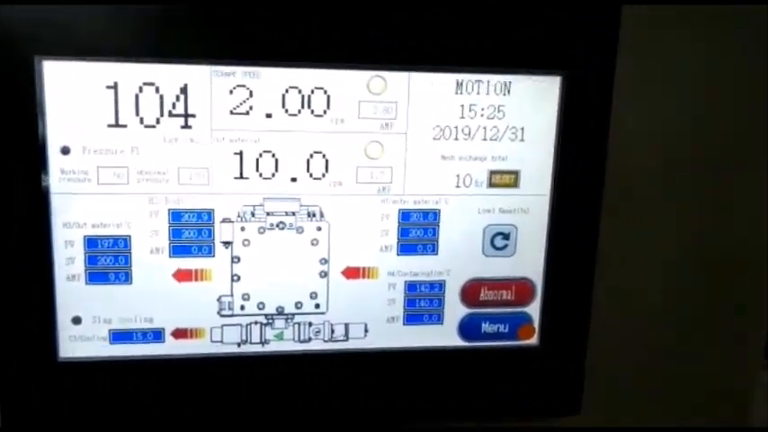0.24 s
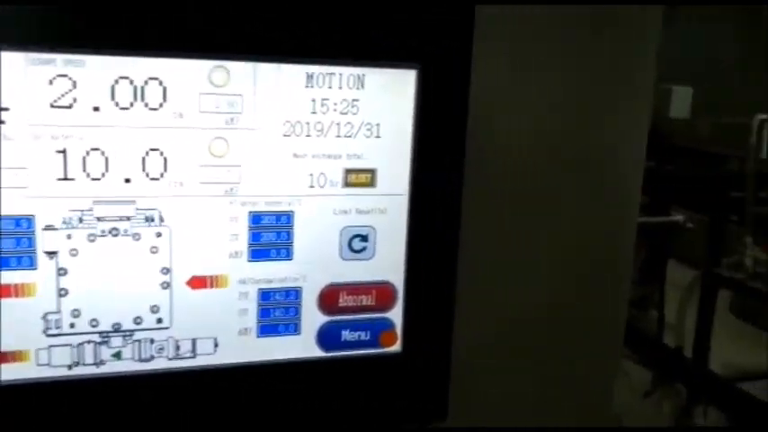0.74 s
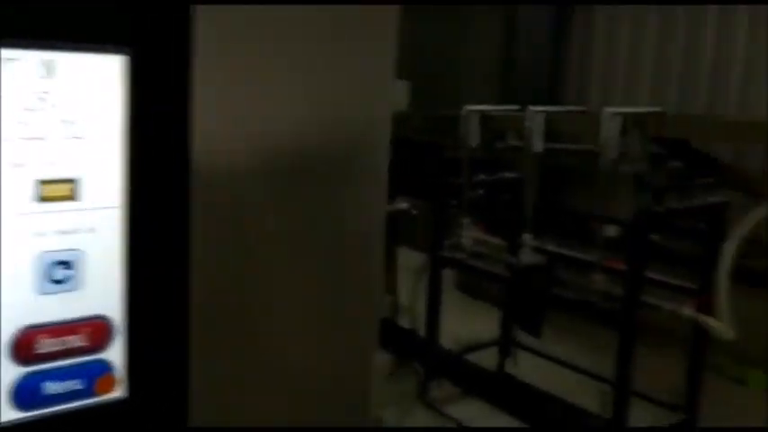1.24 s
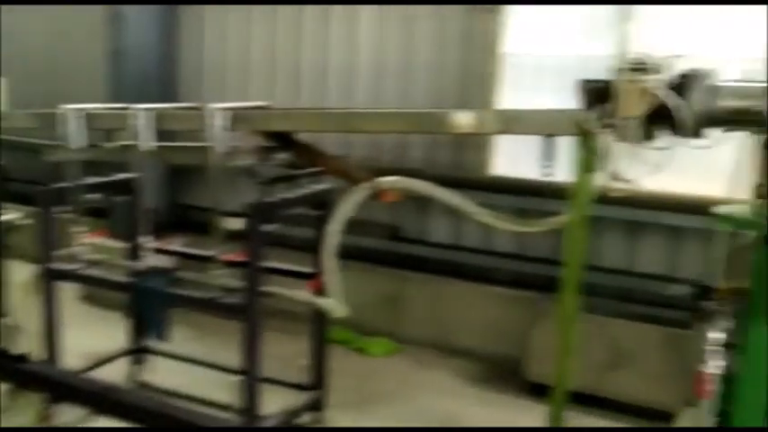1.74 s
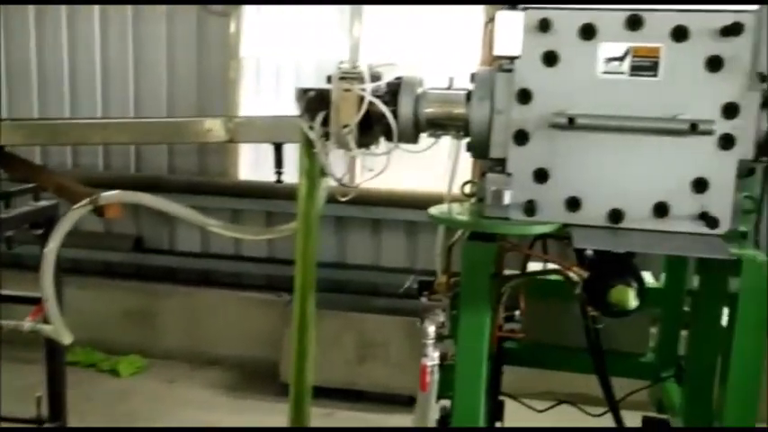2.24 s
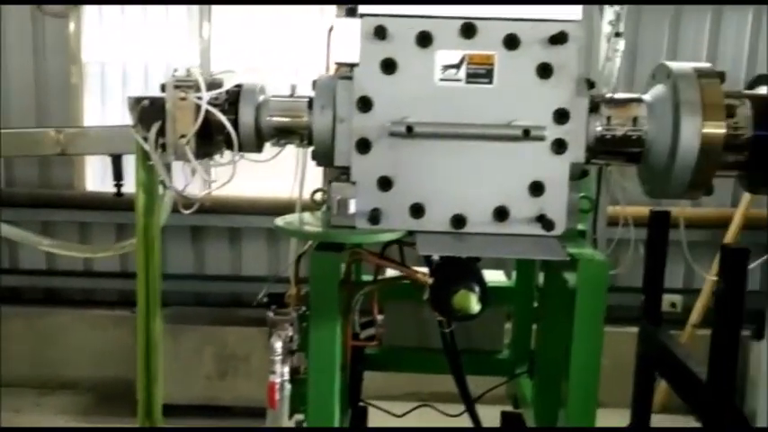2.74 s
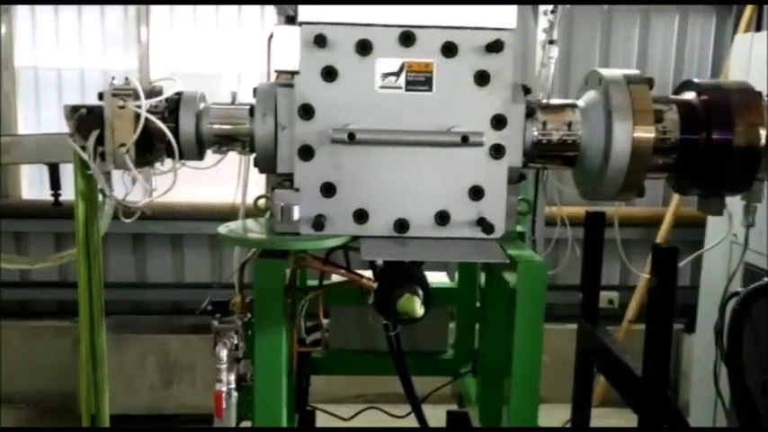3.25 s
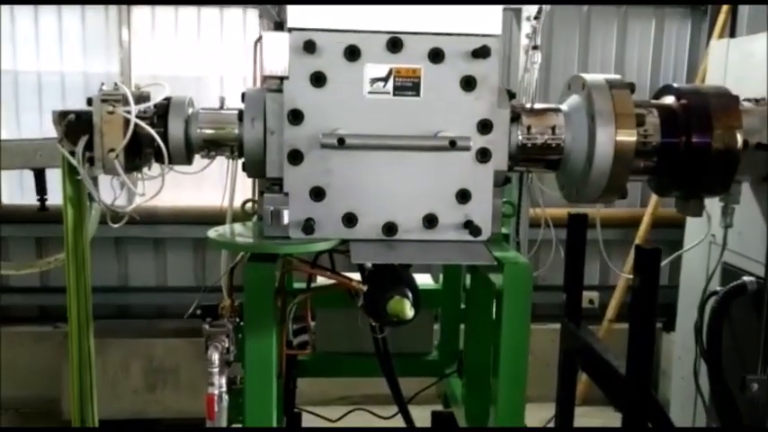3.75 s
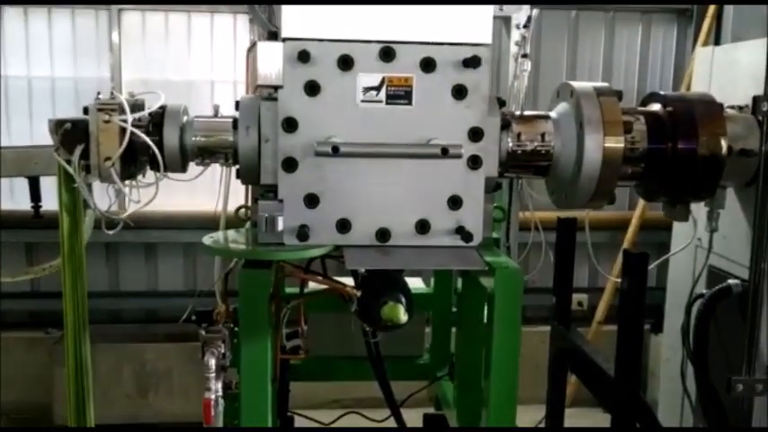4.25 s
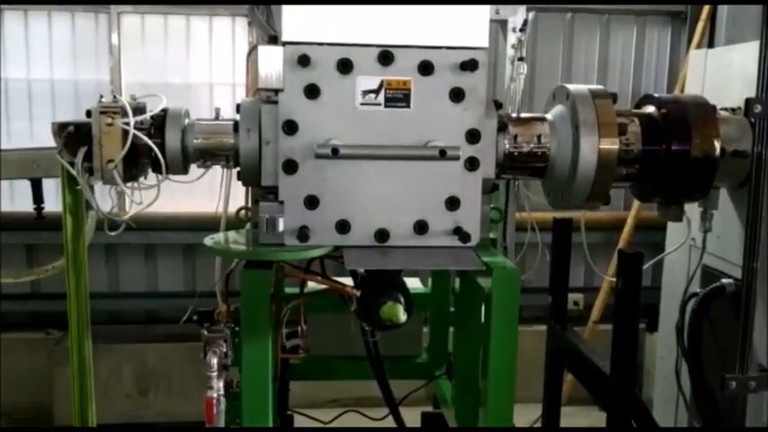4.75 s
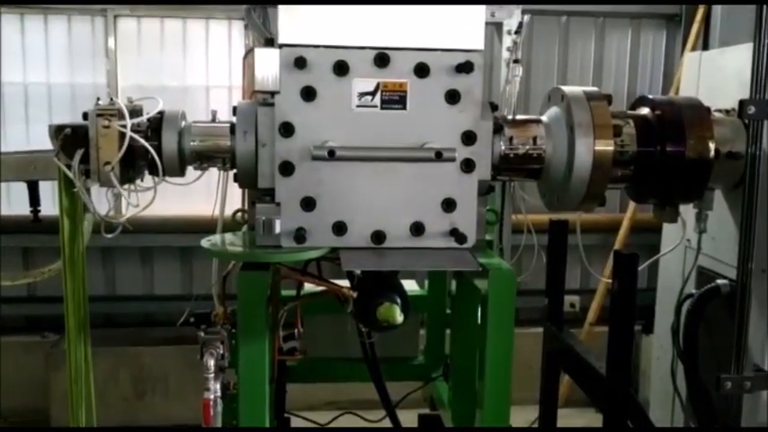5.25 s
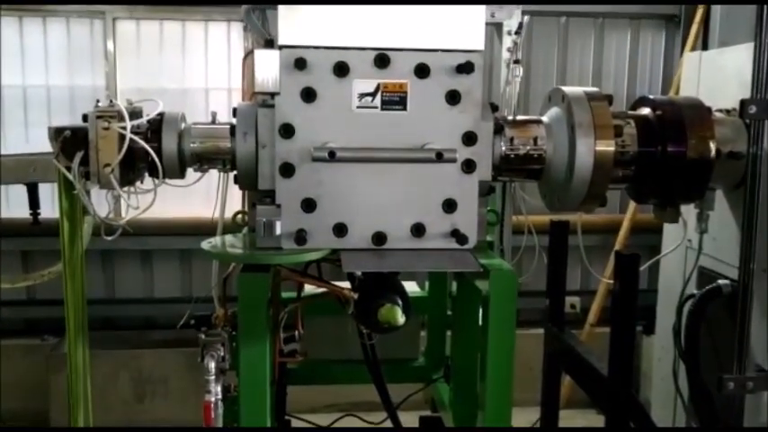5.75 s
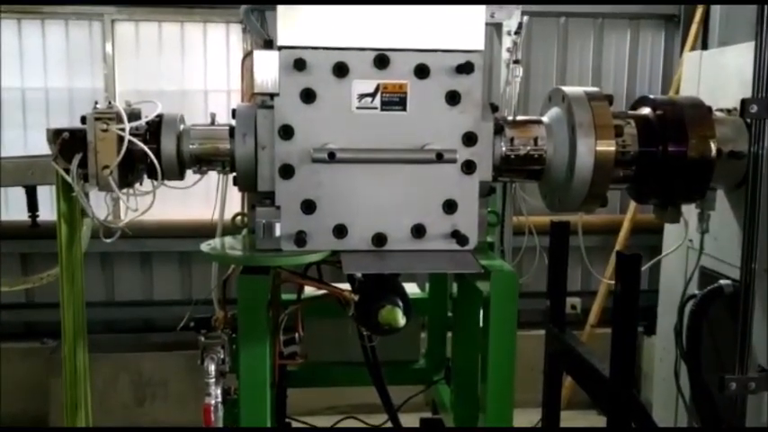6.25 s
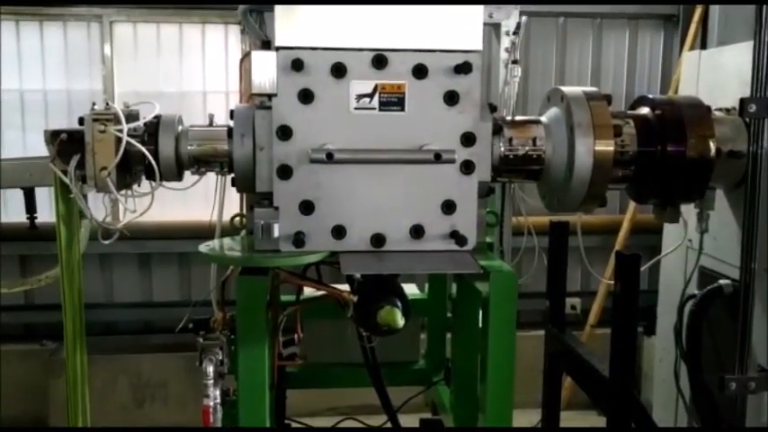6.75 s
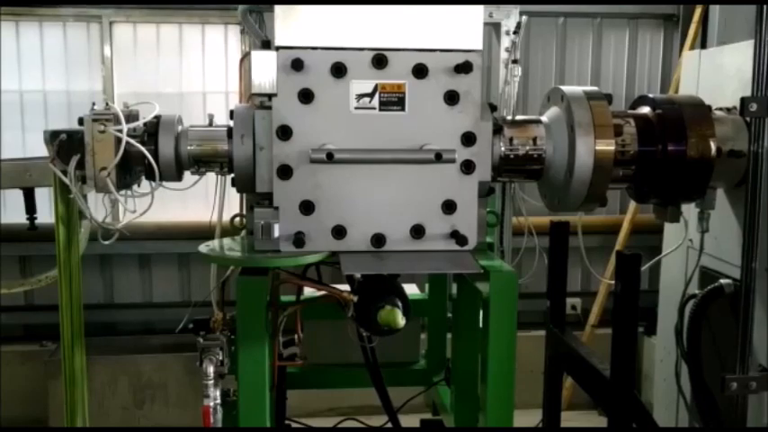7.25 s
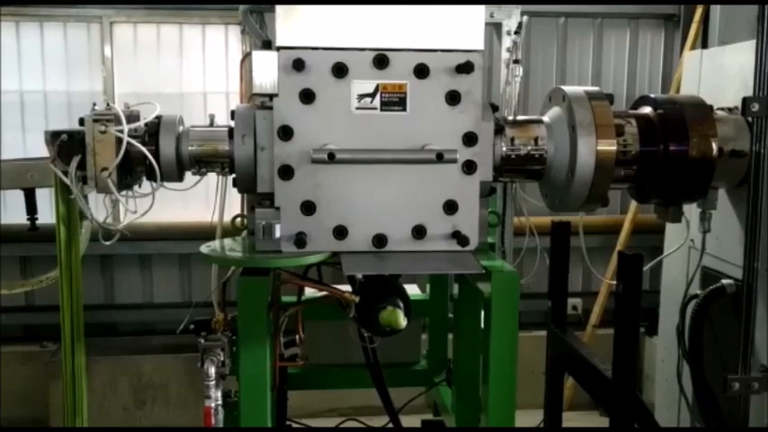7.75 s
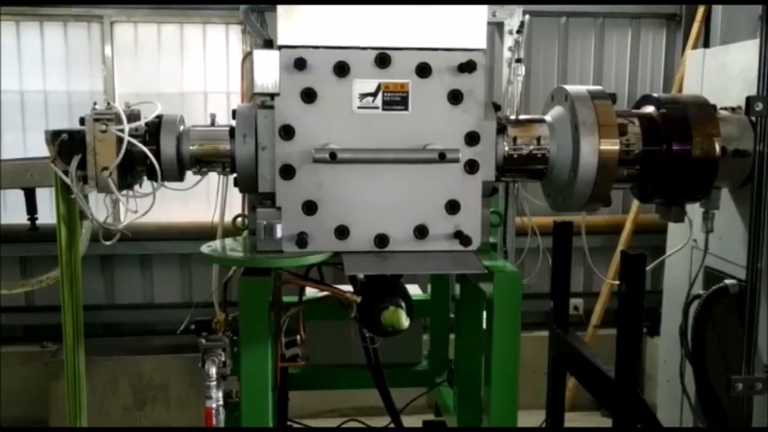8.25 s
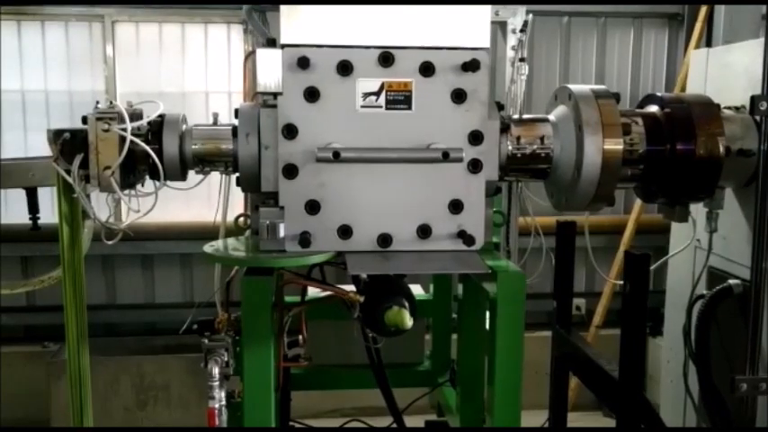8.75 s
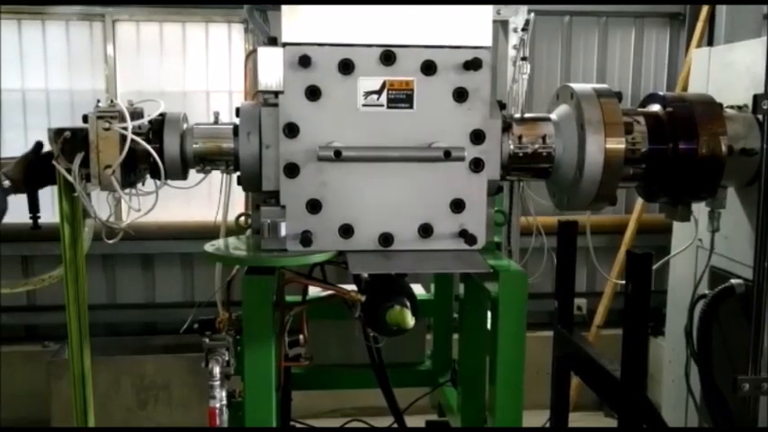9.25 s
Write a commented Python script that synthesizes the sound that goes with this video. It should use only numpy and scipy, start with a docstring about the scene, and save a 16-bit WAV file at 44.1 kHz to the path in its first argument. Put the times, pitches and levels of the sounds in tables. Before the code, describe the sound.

In a reverberant factory hall, an extruder's motor inverter gives a piercing, dense cluster of high whines, creeping slowly upward and surging unevenly between left and right. Gear tones, low hum, rumble and a broad airy roar run beneath. The hand-held stereo microphone swings from control panel to machine; the noise grows slightly fuller, the main whine later eases, and everything stops dead.

```python
"""A motor inverter whines on an extruder line in a factory hall: a comb of lines round a slowly rising
pitch, mixed from switching rate and motor turning, surging as lines cross standing waves. Gears, shafts
and a distant inverter hum as tones that fade in and out; filtered noise makes thrum, rumble, roar and
hiss. A hand-held stereo microphone swings from control panel to extruder. The sound stops dead."""
import sys
import numpy as np
from scipy import signal
from scipy.io import wavfile
from scipy.ndimage import uniform_filter1d

SR = 44100
rng = np.random.default_rng(int(sys.argv[2]) if len(sys.argv) > 2 else 0)


def transcribe(signal):
    """Save signal, clipped to [-1, 1], as a 16-bit WAV file at the path in sys.argv[1]."""
    frames = np.atleast_2d(signal).T
    limited = np.clip(frames, -1, 1)
    pcm = np.round(limited * 32767).astype(np.int16)
    wavfile.write(sys.argv[1], SR, pcm)


def gain_from_decibels(decibels):
    """Convert decibel values to linear amplitude factors."""
    exponent = np.asarray(decibels, float) / 20
    return 10 ** exponent


N = 419391

# Gliding inverter. Each row: time in s, switching rate in Hz, motor turning in Hz, outer line spacing in Hz.
INVERTER_GLIDE = [(0.0, 3086.7, 18.9, 392.9), (1.0, 3111.3, 18.5, 392.8), (2.0, 3128.6, 18.2, 392.5),
                  (3.5, 3152.2, 17.9, 392.1), (4.0, 3159.8, 17.6, 385.5), (4.5, 3167.0, 17.1, 369.5),
                  (5.5, 3182.4, 16.2, 323), (6.0, 3192.4, 16.0, 298.9), (7.0, 3220.1, 16.1, 240),
                  (8.0, 3252.6, 16.5, 214.5), (9.0, 3289.2, 16.7, 194.2), (9.5, 3308.9, 16.7, 184.0)]
# Strong comb lines. Each row: multiples of switching rate, outer spacing, motor turning.
STRONG_LINE_MIX = [(1, 0, -3), (1, 0, 3), (1, -1, -3), (1, -1, 3)]
# Strong comb lines. Each entry: level in dB before COMB_GAIN.
STRONG_LINE_DB = [-40, -42, -39.5, -40]
# Weak comb lines. Each row: multiples of switching rate, outer spacing, motor turning.
WEAK_LINE_MIX = [(1, 0, -9), (1, 0, -7), (1, 0, -5), (1, 0, -1), (1, 0, 1), (1, 0, 5), (1, 0, 9),
                 (1, 0, 15), (1, 0, -15), (1, -1, -15), (1, -1, -9), (1, 1, -3), (1, 1, -1), (1, 1, 3),
                 (1, 1, 9), (2, 0, -2), (2, 0, 2), (2, -1, 0), (2, -1, 2), (2, 1, -2)]
# Weak comb lines. Each entry: level in dB before COMB_GAIN.
WEAK_LINE_DB = [-40, -47, -42, -43, -41, -42, -43, -55, -50, -51, -46, -42, -53, -45, -57, -63, -59, -65,
                -63, -60]
# Gain of strong and weak lines. Each row: time in s, gain in dB.
COMB_GAIN = [(0, 4.5), (1.5, 4.5), (3, 2.5), (4.5, 5.5), (6, 3), (7.5, -2), (9.5, -4)]
# Standing-wave surges of the lower, upper and octave line, one list per line.
# Each row: centre in s, left peak in dB, right peak in dB, left lead in rad; overlapping surges add.
LINE_SURGES = [
    [(.1, -26, -27, 2.2), (.3, -30, -30, -3), (.52, -23, -27, 2), (1.0, -30, -20.5, -1.5),
     (1.25, -29, -24.5, 1.7), (1.56, -35, -21, 3), (2.04, -23, -21.5, 1.5), (2.55, -21, -31, -2.5),
     (2.78, -32.5, -27.5, 0), (3.05, -30, -28.5, -2.5), (3.65, -46, -28, 2), (4.0, -33, -32, 5),
     (4.2, -38, -34, 1.5), (4.46, -37, -29, 0.5), (4.9, -37, -42, 7), (5.7, -24.5, -34, -1),
     (6.36, -31, -26, -1.5), (6.62, -34, -28.5, 2.8), (7.26, -28, -27, 2), (8.76, -39, -39, 3),
     (9.1, -42, -35, -2.5)],
    [(.12, -36, -32, 2.3), (.36, -37, -25.5, 3.1), (.66, -32, -28, 2), (.86, -24.5, -30, 0),
     (1.65, -25.5, -32, -3), (2.3, -38, -26, 4), (2.64, -35, -28, 4), (3.0, -38, -28, 3.5),
     (4.02, -25, -36, -2), (4.64, -28, -24, -.5), (4.95, -39, -28, -1), (5.48, -48, -28, -5),
     (6.55, -36, -34.5, 1.3), (6.84, -32.5, -33, -1.8), (7.2, -35, -30, 1), (7.58, -37, -43, 2),
     (7.82, -29, -48, 1), (8.52, -34, -42, -0.5), (8.95, -33, -33, 0.9)],
    [(.1, -62, -43, 1), (.55, -54, -40, -1), (3.3, -57, -50, -.6), (3.65, -62, -47, -.9),
     (4.6, -54, -48, -3), (4.85, -54, -44, 0), (5.5, -57, -43, -2), (7.6, -58, -53, -4),
     (8.4, -58, -51, 1.3)],
]
# Steady gear tones. Each entry: frequency in Hz.
GEAR_TONE_HZ = [153.4, 920.9]
# Steady gear tones. Each row: level at panel in dB and at extruder in dB (both before the waver),
# left over right in dB, left lead in rad, waver depth from 0 to 1.
GEAR_TONE_ROWS = [(-36.5, -41.5, -1.6, -0.16, .4), (-37, -30.5, -6, 1.07, 0.02)]
# Gear tones with shifting standing waves. Each entry: frequency in Hz.
SHIFTING_GEAR_HZ = [230.1, 654, 429.3, 2072.8, 2094]
# The same tones at the ears, one list per tone.
# Each row: time in s, left level in dB, right level in dB, left lead in rad.
SHIFTING_GEAR_ROWS = [
    [(0, -37.5, -34, 0), (1, -42, -39, .1), (1.5, -37, -34, 0), (2.2, -39, -34, -.2), (3.5, -43, -41, -.2),
     (5, -36.5, -35.5, -.2), (5.5, -38, -35.5, -.1), (6.1, -34, -31.5, -.2), (6.9, -41, -38.5, -.1),
     (8.1, -35.5, -33, -0.16), (9.5, -43, -41, -.1)],
    [(0, -36, -34.5, -.7), (1.05, -37, -34, -.8), (1.35, -61, -62, -0.88), (2.3, -46, -41, -.7),
     (3, -53, -47, -.9), (3.7, -46, -42, -0.94), (9.5, -44.5, -40.5, -1.1)],
    [(0, -39, -48, .2), (2.1, -36.5, -36.5, .3), (3.1, -43, -36.5, .3), (4.2, -49, -43, .3),
     (5, -53.5, -59, .3), (9.5, -57, -50.5, .2)],
    [(0, -24.5, -28, -1.5), (.7, -31.5, -38, -0.3), (1.1, -30, -27.5, -0.5), (1.45, -29, -27.5, -1.2),
     (1.6, -38, -28.5, -4), (1.8, -31, -24, -1.6), (2.15, -35, -36, 2.5), (2.5, -28, -35, -1.8),
     (3.2, -44, -30.5, -2.5), (3.85, -29, -27, -3.5), (4.5, -28.5, -38, -3.5), (5.0, -40, -43, -8.5),
     (5.95, -34, -28.5, -5), (6.4, -39, -36.5, -6), (7.1, -32, -33.5, -5), (8.35, -29, -31, -5),
     (8.8, -42, -29.5, -9), (9.5, -36, -26, -5.5)],
    [(0, -40, -47, 3.8), (1, -49, -47, 4), (1.5, -40, -33, 3.9), (3, -53, -46, 5.5), (5.75, -51, -47, 5.4),
     (6.25, -28, -36, 9.4), (6.6, -30, -39, 8.2), (7.1, -30.5, -32.5, 6.6), (8, -34, -28, 7),
     (8.6, -38, -27, 7.2), (9.5, -39, -24.5, 8.6)],
]
# Shaft, pump and housing hum. Each row: frequency in Hz, level in dB, fade rate in 1/s.
HUM_TONES = [(57.9, -48, 4), (76.7, -47, 4), (134, -47, 6), (176.3, -44, 6), (270.5, -41, 4), (293, -47, 4),
             (345.9, -42, 4), (400, -47, 8), (455, -51, 4), (605.6, -50, 3), (634, -52, 3), (690.4, -46, 3),
             (755, -53, 6), (981.1, -48, 3), (1036.3, -49, 3), (1094.2, -54, 3), (1308.1, -53, 4),
             (1324, -53, 4), (1380.8, -52, 4), (1745, -54, 6), (2298.7, -47, 4), (2321.5, -46, 4),
             (2476.3, -52, 4)]
# Distant steady inverter. Each row: frequency in Hz, level in dB, fade rate in 1/s.
FAR_INVERTER_TONES = [(3929.8, -57, 3), (3970.2, -57, 3), (3999.8, -57, 3), (4029.4, -57, 3),
                      (4068.4, -57, 3), (4500.4, -56, 4), (5970.1, -64, 4), (7979.4, -69, 3),
                      (8018.4, -70, 3), (9350.8, -70, 6), (11929.4, -67, 4), (11968.4, -63, 4),
                      (12027.6, -68, 4), (12068, -69, 4)]
# Deepest noise, spectrum shape. Each row: frequency in Hz, relative density in dB per Hz.
THRUM_SHAPE = [(12, -55), (20, -18), (41, -4.5), (59, -1), (95, 2), (120, -30), (210, -120)]
# Thrum swells. Each row: centre in s, half width in s, rise in dB.
THRUM_SWELL_ROWS = [(1.2, .25, 2), (1.6, 0.067, 3), (3.1, .15, 9), (5.42, .08, 3), (6.1, .3, 9.5),
                    (7.7, 0.2, 5.5), (8.4, .12, 4)]
# Low noise, spectrum shape. Each row: frequency in Hz, relative density in dB per Hz.
RUMBLE_SHAPE = [(47, -35), (80, -11.5), (146, -2), (245, -1.5), (402, -3), (502, -8.5), (652, -6),
                (835, -6), (914, -6), (989, -7), (1110, -10.5), (1800, -9.5), (2340, -47), (3960, -120)]
# Middle noise, spectrum shape. Each row: frequency in Hz, relative density in dB per Hz.
ROAR_SHAPE = [(760, -39), (1300, -8), (1700, -8.5), (1890, -7), (2070, -0.5), (2200, -2), (2360, -0.5),
              (2740, -4.5), (3250, -4), (3720, -12.5), (4300, -22), (5590, -31), (9460, -120)]
# High noise, spectrum shape. Each row: frequency in Hz, relative density in dB per Hz.
HISS_SHAPE = [(2350, -25), (4000, 0.5), (5350, -7), (6440, -5.5), (7000, -16), (7620, -21.5), (8200, -19.5),
              (9170, -10), (10100, -13), (12000, -11.5), (13100, -14.5), (14200, -26)]
# Microphone swing. Each row: time in s, share of the way from panel to extruder.
SWING = [(0, 0.24), (1.0, 0.23), (1.5, 0.29), (2.7, 0.82), (9.5, 1)]
# Diffuse field. Each row: frequency in Hz, left-right likeness from 0 to 1.
EAR_LIKENESS = [(60, 0.91), (160, 0.99), (430, 0.83), (710, 0.75), (1160, 0.4), (1900, 0.37), (3100, 0.094),
                (5000, 0.065), (14000, .05)]
# Diffuse field. Each row: frequency in Hz, left lead of the shared part in rad.
EAR_LEAD = [(0, -1), (690, 0.52), (1640, 3), (2330, -1), (4220, -5.5), (6370, -8), (13000, -49),
            (13900, -38)]
# Diffuse field. Each row: frequency in Hz, left over right in dB.
EAR_TILT = [(60, -0.5), (120, -1.5), (230, -1.5), (460, -1), (910, -2.5), (1790, -3), (3520, 0.5),
            (6950, -4), (13700, -8)]


def inverter():
    """Switching mixes with the motor's turning into a comb; three lines also surge."""
    switching_hz, turning_hz, spacing_hz = curves(INVERTER_GLIDE)
    drive_hz = np.array([switching_hz, spacing_hz, turning_hz])
    strong = sum(fading_tone(np.dot(mix, drive_hz), db, per_s=8)
                 for mix, db in zip(STRONG_LINE_MIX, STRONG_LINE_DB))
    weak = sum(fading_tone(np.dot(mix, drive_hz), db, per_s=9)
               for mix, db in zip(WEAK_LINE_MIX, WEAK_LINE_DB))
    octave = fading_tone(2 * switching_hz, -55, per_s=3)
    surging_hz = [*np.dot(STRONG_LINE_MIX[:2], drive_hz), 2 * switching_hz]
    surges = sum(surging_line(hz, rows) for hz, rows in zip(surging_hz, LINE_SURGES))
    return (strong + weak) * gain_from_decibels(curves(COMB_GAIN)[0]) + octave + surges


def surging_line(hz, rows):
    """A gliding line surges as it crosses standing waves; each surge is a Gaussian in time."""
    half_width_s = 0.13
    slow_s = np.arange(0, N + 256, 256) / SR
    s, left_db, right_db, lead_rad = np.transpose(rows)[:, :, None]
    shape = np.exp(-0.5 * ((slow_s - s) / half_width_s) ** 2)
    left = (shape * gain_from_decibels(left_db) * np.exp(0.5j * lead_rad)).sum(0)
    right = (shape * gain_from_decibels(right_db) * np.exp(-0.5j * lead_rad)).sum(0)
    return placed_tone(hz, smooth([left, right]), flutter=0.4, per_s=14)


def gears():
    """Gear meshes sound steady tones."""
    return sum(gear_tone(hz, *row) for hz, row in zip(GEAR_TONE_HZ, GEAR_TONE_ROWS))


def gear_tone(hz, panel_db, extruder_db, tilt_db, lead_rad, waver):
    """A steady tone follows the swing and wavers slowly, alike in both ears."""
    db = swung(panel_db, extruder_db)
    slow = smooth(1 + waver * drifting(per_s=1.5)[:1])
    at_ears = slow * ears(db + tilt_db / 2, db - tilt_db / 2, lead_rad)
    return placed_tone(hz, at_ears, flutter=0.22, per_s=10)


def shifting_gears():
    """Standing waves of gear tones shift past the ears, changing level and phase at each."""
    return sum(placed_tone(hz, ears(*curves(rows)), flutter=0.36, per_s=14)
               for hz, rows in zip(SHIFTING_GEAR_HZ, SHIFTING_GEAR_ROWS))


def hum():
    """Shafts, pumps and housings hum at fixed frequencies through the hall's echoes."""
    return sum(fading_tone(*row) for row in HUM_TONES)


def far_inverter():
    """A second inverter, further off, switches steadily: fixed lines through the echoes."""
    return sum(fading_tone(*row) for row in FAR_INVERTER_TONES)


def thrum():
    """The deepest noise comes in lumps and swells at set moments."""
    lumps = abs(smooth(1 + 0.35 * drifting(per_s=4.4)[:1]))
    swells_db = sum(db * bell(s, half_s) for s, half_s, db in THRUM_SWELL_ROWS)
    level_db = swung(-48.5, -47.5) + swells_db
    return hall_noise(THRUM_SHAPE, level_db, from_hz=15, patchy_db=0.5) * lumps


def rumble():
    """Low diffuse noise follows the swing."""
    return hall_noise(RUMBLE_SHAPE, swung(-31, -29), from_hz=30, patchy_db=1.0)


def roar():
    """Middle diffuse noise follows the swing and, slightly, the comb's gain."""
    level_db = swung(-32.5, -30.5) + 0.051 * curves(COMB_GAIN)[0]
    return hall_noise(ROAR_SHAPE, level_db, from_hz=1810, patchy_db=0.86)


def hiss():
    """High diffuse noise follows the swing and swells briefly once."""
    level_db = swung(-43, -40.5) + 3 * bell(3.08, half_s=0.059)
    return hall_noise(HISS_SHAPE, level_db, from_hz=4230, patchy_db=1.2)


def hall_noise(shape, level_db, from_hz, patchy_db):
    """Diffuse noise with drifting patches; level_db sets the mid signal above from_hz, before patches."""
    frames, hz = N // 256 + 5, np.fft.rfftfreq(1024, 1 / SR)
    a, b, c, d, patches = rng.standard_normal((5, frames, 513))
    patches = uniform_filter1d(patches, size=12, axis=0)
    patches = uniform_filter1d(patches, size=12, axis=1)
    z = pair(a + 1j * b, c + 1j * d, hz) * gain_from_decibels(read(shape, hz))
    counted = hz > from_hz
    z /= np.sqrt(np.mean(abs(z.mean(0)[:, counted]) ** 2) * np.mean(counted))
    z *= gain_from_decibels(patchy_db * patches / patches.std())
    z = z.transpose(0, 2, 1)
    x = signal.istft(z, nperseg=1024, noverlap=768, scaling="psd")[1][:, :N]
    return 2 * x * gain_from_decibels(level_db)


def placed_tone(hz, at_ears, flutter, per_s):
    """A tone with given gain and phase at each ear; late echoes flutter it."""
    echoes = smooth(1 + flutter * drifting(per_s)) / np.sqrt(1 + flutter ** 2)
    return np.sqrt(2) * (spin(hz) * echoes * at_ears).real


def fading_tone(hz, db, per_s):
    """A tone heard only through the hall's echoes, which drift in and out of step."""
    echoes = smooth(pair(*drifting(per_s), np.mean(hz)))
    return np.sqrt(2) * gain_from_decibels(db) * (spin(hz) * echoes).real


def pair(left, other, hz):
    """Two ears in a diffuse field: the right shares part of the left's and adds an unrelated one."""
    same = np.clip(read(EAR_LIKENESS, hz), 0, 1)
    side = np.sqrt(gain_from_decibels(read(EAR_TILT, hz)))
    right = same * left * np.exp(-1j * read(EAR_LEAD, hz)) + np.sqrt(1 - same ** 2) * other
    return np.array([left * side, right / side])


def ears(left_db, right_db, lead_rad):
    """Gain and phase at the two ears, the lead split evenly."""
    half = np.exp(0.5j * lead_rad) * np.ones(N)
    return np.array([gain_from_decibels(left_db) * half, gain_from_decibels(right_db) / half])


def swung(panel_db, extruder_db):
    """A level that follows the swing of the microphone."""
    return panel_db + (extruder_db - panel_db) * curves(SWING)[0]


def drifting(per_s):
    """Two unrelated sums of 12 paths at random frequency offsets, one value in 256 samples."""
    offset_hz = rng.standard_normal((2, 12, 1)) * per_s / 2
    start = rng.random((2, 12, 1))
    slow_s = np.arange(0, N + 256, 256) / SR
    return np.exp(2j * np.pi * (offset_hz * slow_s + start)).sum(1) / np.sqrt(12)


def smooth(slow):
    """Interpolates values 256 samples apart to every sample."""
    return np.array([np.interp(np.arange(N) / 256, np.arange(len(ear)), ear) for ear in slow])


def spin(hz):
    """A turning pointer that follows a frequency curve from a random phase."""
    return np.exp(2j * np.pi * (np.cumsum(hz * np.ones(N)) / SR + rng.random()))


def bell(s, half_s):
    """A Gaussian bump of height 1 around a moment."""
    return np.exp(-0.5 * ((np.arange(N) / SR - s) / half_s) ** 2)


def curves(rows):
    """Each column of a time table, sample by sample."""
    s, *columns = np.transpose(rows)
    return [np.interp(np.arange(N) / SR, s, column) for column in columns]


def read(points, hz):
    """A frequency table at the given frequencies, on a log axis."""
    f, value = np.transpose(points)
    return np.interp(np.log(hz + 1), np.log(f + 1), value)


def scene():
    """Everything in the hall, as the two ears get it."""
    tones = inverter() + gears() + shifting_gears() + hum() + far_inverter()
    return tones + thrum() + rumble() + roar() + hiss()


def roll_off(x):
    """The treble ends steeply here."""
    return signal.sosfilt(signal.butter(12, 14300, fs=SR, output="sos"), x)


def record(dry):
    """The deepest bass is dropped, the band ends sharply, the sound is cut off."""
    stop_s, ramp_s, edge_hz = 9.4575, 0.00081, 14250
    bass_cut = signal.butter(2, 42, "high", fs=SR, output="sos")
    heard = signal.sosfilt(bass_cut, dry)
    edge = signal.firwin(511, edge_hz, window=("kaiser", 9), fs=SR)
    heard = signal.oaconvolve(heard, edge[None], "same")
    on = np.clip((stop_s - np.arange(N) / SR) / ramp_s, 0, 1)
    return roll_off(heard * on)


dry = scene()
out = record(dry)
transcribe(out)
```